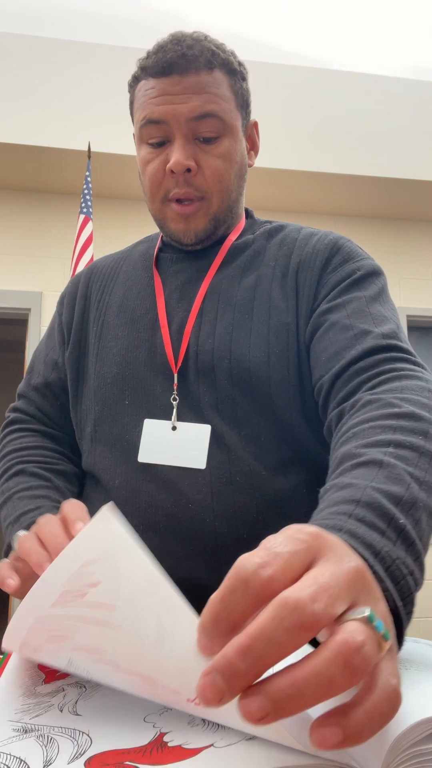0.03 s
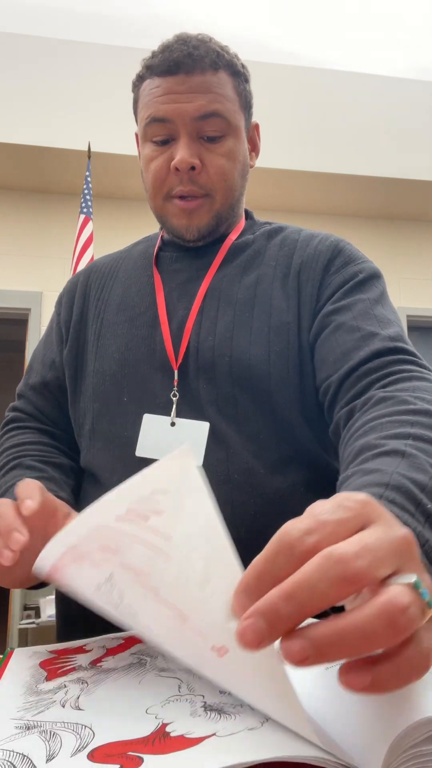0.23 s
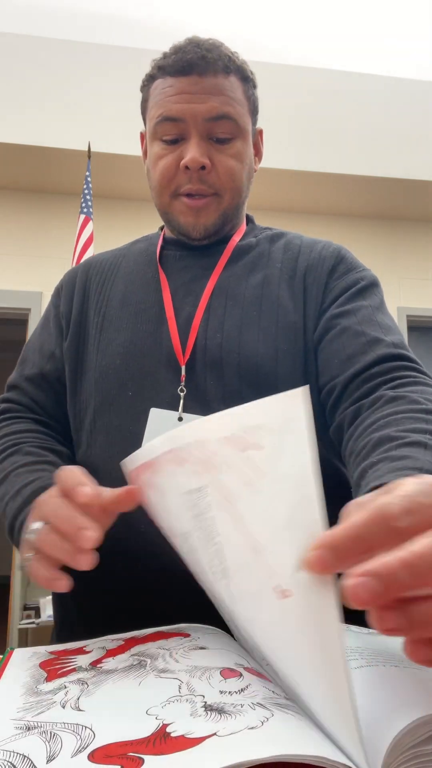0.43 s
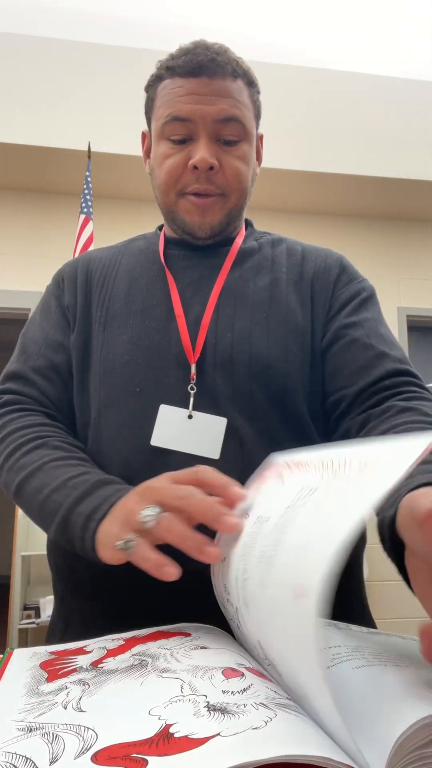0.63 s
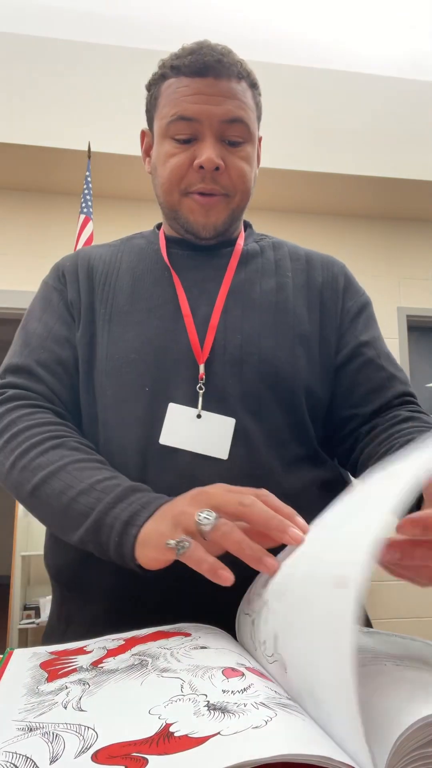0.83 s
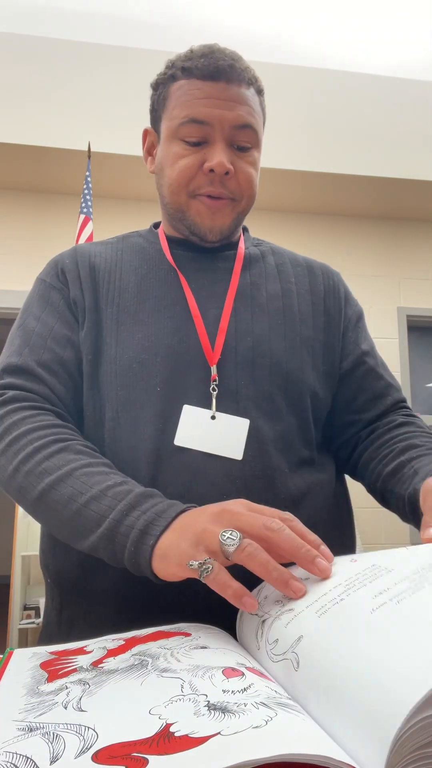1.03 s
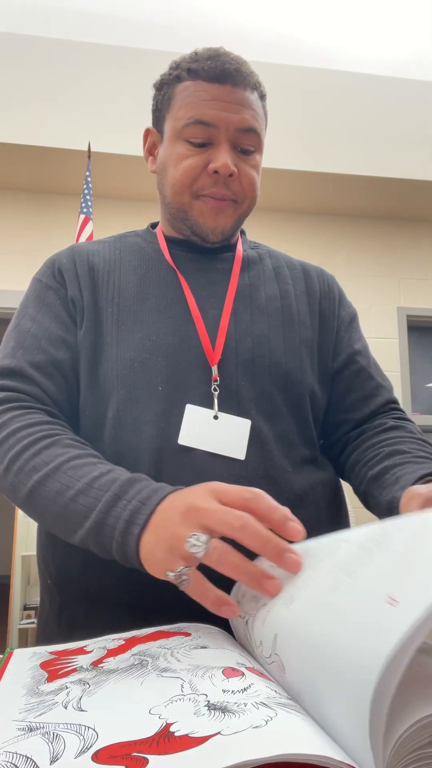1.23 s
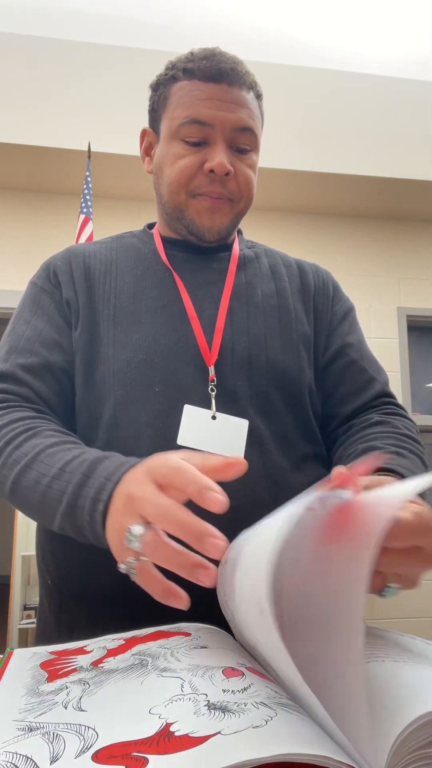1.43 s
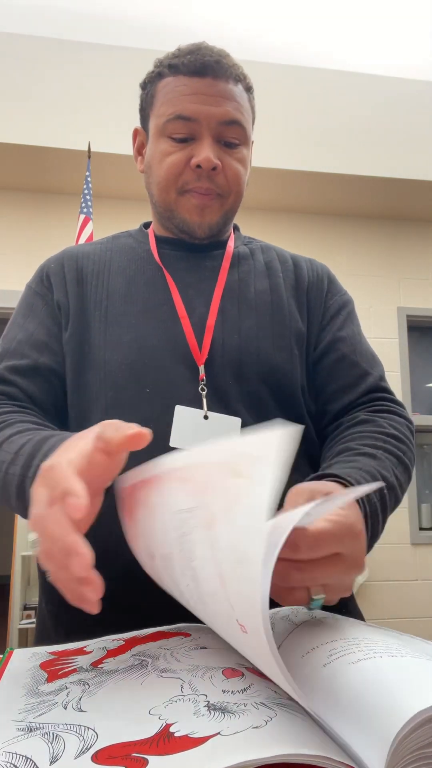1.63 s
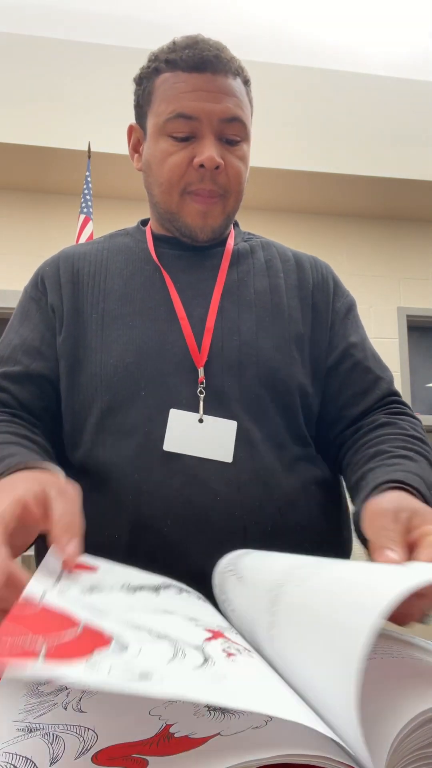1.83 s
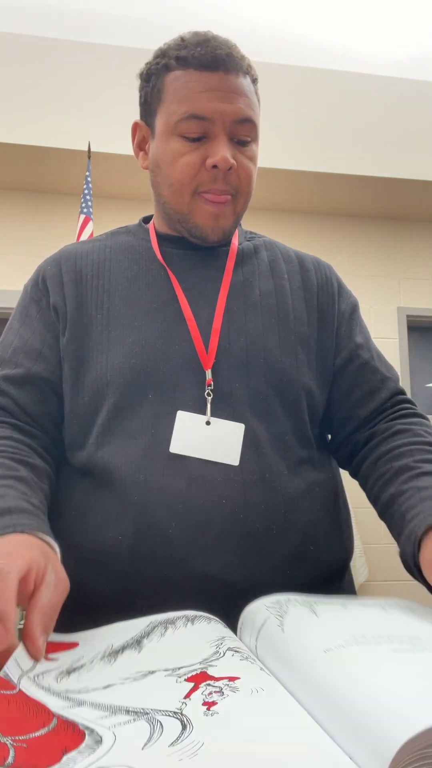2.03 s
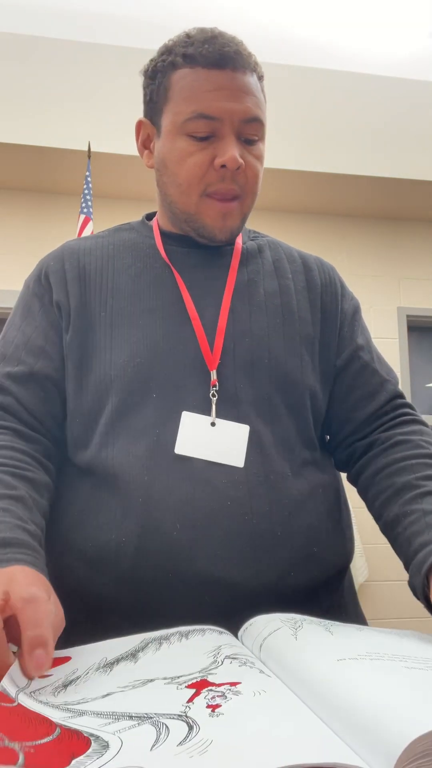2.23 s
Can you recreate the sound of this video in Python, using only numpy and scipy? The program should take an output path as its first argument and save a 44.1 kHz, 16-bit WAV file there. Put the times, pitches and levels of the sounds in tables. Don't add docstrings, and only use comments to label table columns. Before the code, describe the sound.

A large stiff book page is turned close to the microphone, buckling in sharp snaps with low thuds, then after a lull sliding over in a bright hiss and settling with soft pats, over faint room rumble.

```python
import sys
import numpy as np
from scipy import signal
from scipy.fft import rfft, irfft, next_fast_len
from scipy.io import wavfile
from scipy.ndimage import uniform_filter1d, map_coordinates

SR = 44100
rng = np.random.default_rng(int(sys.argv[2]) if len(sys.argv) > 2 else 0)


def log_audio(samples):
    frames = np.atleast_2d(samples).T
    limited = np.clip(frames, -1, 1)
    pcm = np.round(limited * 32767).astype(np.int16)
    wavfile.write(sys.argv[1], SR, pcm)


def how_loud(loudness_db):
    steps = np.asarray(loudness_db, float) / 20
    return 10 ** steps


N = 101429


def unit(x):
    return x / np.sqrt(np.mean(x ** 2) + 1e-20)


def noise(shape):
    return rng.standard_normal(shape)


def along(points, hz):
    f, v = np.transpose(points)
    return np.interp(np.log(hz + 1), np.log(f + 1), v)


def over_time(points):
    return np.interp(np.arange(N) / SR, *np.transpose(points))


def closed(points):
    return [(points[0][0] / 2, points[0][1] - 24), *points, (points[-1][0] * 1.2, points[-1][1] - 30)]


def filtered(x, response):
    m = next_fast_len(x.shape[-1] + 8192)
    return irfft(rfft(x, m) * response(np.fft.rfftfreq(m, 1 / SR)), m)[..., :x.shape[-1]]


def wobble(rate):
    return map_coordinates(noise(int(N * rate / SR) + 4), [np.arange(N) * rate / SR])


def patches(shape, bins, frames):
    return unit(uniform_filter1d(uniform_filter1d(noise(shape), bins, 0), frames, 1))


def rush(x, spectrum, patchy_db):
    z = signal.stft(x, nperseg=512)[2]
    x = signal.istft(z * how_loud(patchy_db * patches(z.shape, 6, 8)), nperseg=512)[1][:N]
    return unit(filtered(x, lambda hz: how_loud(along(closed(spectrum), hz))))


def add(track, s, piece):
    part = track[max(round(s * SR), 0):][:len(piece)]
    part += piece[:len(part)]


# frequency [Hz], level [dB].
VENT_COLOUR = [(32, -5.5), (60, 1.5), (220, -1), (400, -11), (900, -15), (2400, -23.5), (5200, -47.5),
               (14000, -50.5)]


def ventilation():
    level_db = -49 + .7 * wobble(7)
    return how_loud(level_db) * rush(noise(N), VENT_COLOUR, patchy_db=1.3)


# frequency [Hz], time to fall 60 dB [s].
HALL_T60 = [(100, 1), (2000, 0.37), (4500, 0.066), (6500, 0.014)]


def hall(page):
    hz, t, z = signal.stft(noise(SR // 3), SR, nperseg=256)
    tail = signal.istft(z * how_loud(-60 * t / along(HALL_T60, hz)[:, None]), SR, nperseg=256)[1]
    tail = tail / np.linalg.norm(tail)
    return how_loud(-24) * signal.fftconvolve(np.pad(page, (500, 0)), tail)[:N]


# time [s], level [dB], brightness [dB], centre of the hiss [kHz].
SLIDE_STROKE = [(0, -50.5, -13, 7.2), (.14, -74.5, -35, 13), (.42, -50, -29, 10), (0.431, -47.5, -7.5, 6.9),
                (.52, -51.5, -12, 4.7), (.6, -62, -33, 12), (0.778, -68, -23, 8.3), (.975, -61.5, -7, 10.4),
                (1.03, -63, -17, 10), (1.092, -58, -15, 6.9), (1.11, -51.5, -6, 9.4),
                (1.26, -39.5, -6, 6.9), (1.35, -45.5, -6.5, 7.6), (1.5, -46.5, -16.5, 8.9),
                (1.64, -50.5, -15, 7.2), (1.8, -62.5, -13, 7.1), (1.98, -61.5, -8.5, 8.1),
                (2.1, -61.5, -4.5, 8.2), (2.3, -64.5, -16, 11)]
# frequency [Hz], level [dB].
SLIDE_BODY = [(400, -16), (800, -6.5), (1300, -3.5), (1700, -5), (2300, 0), (3300, -8.5), (4600, -13)]
# frequency [Hz], level [dB].
SLIDE_HISS = [(5200, 4.5), (5800, -2), (6600, -5), (8000, -6.5), (12700, -1), (15500, -7)]
# time [s], pitch [kHz].
SHEET_NOTCH = [(0, 8.5), (.6, 5.7), (1.1, 6.2), (1.22, 5.2), (1.36, 7.9), (1.6, 7.3), (1.8, 7.2),
               (1.95, 6.1), (2.3, 5.9)]
# time [s], gain below 1700 Hz [dB].
FULLNESS = [(0, 8.5), (.45, 1), (.8, -6), (1.12, -7), (1.25, -1), (1.4, 5), (1.52, -4.5), (1.65, -3),
            (2.3, -1)]


def slide():
    s, level_db, bright_db, centre_khz = np.transpose(SLIDE_STROKE)
    catches = rng.random((2, N)) < 6000 / SR
    grains = catches * how_loud(3.5 * rng.exponential(size=(2, N))) * noise((2, N))
    grit = 0.25 * unit(grains) + noise((2, N))

    hz, t, z = signal.stft(grit[1], SR, nperseg=512)
    khz = hz[:, None] / 1000
    hump = np.exp(-((khz - np.interp(t, s, centre_khz)) / 2.5) ** 2)
    notch = np.exp(-((khz - np.interp(t, *np.transpose(SHEET_NOTCH))) / .6) ** 2)
    bent = signal.istft(z * how_loud(8 * hump - 5 * notch), nperseg=512)[1][:N]
    hiss = rush(bent, SLIDE_HISS, patchy_db=1.8)

    body = rush(grit[0], SLIDE_BODY, patchy_db=3.0)
    body = body + (how_loud(over_time(FULLNESS)) - 1) * filtered(body, lambda f: f < 1700)

    seconds = np.arange(N) / SR
    stroke_db = np.interp(seconds, s, level_db) + .9 * wobble(25)
    hiss_db = stroke_db + np.interp(seconds, s, bright_db) + 1.7 * wobble(40.87)
    return how_loud(stroke_db + wobble(70.0)) * body + how_loud(hiss_db) * hiss


# start [s], level [dB], length [s], centre [Hz], air [dB].
SCUFF_EVENTS = [(0.002, -50.5, 0.14, 400, -38), (0.079, -42, 0.011, 1700, -16.5),
                (0.238, -50, 0.021, 2750, -44), (0.285, -56, 0.012, 1390, -24),
                (0.308, -55.5, 0.03, 3200, -5), (0.32, -63, 0.027, 4000, 7.5), (0.336, -56, 0.012, 4000, 6),
                (0.534, -54, 0.014, 2130, -29), (0.538, -47, 0.02, 2180, -24),
                (0.55, -53.5, 0.0095, 2390, -4.5), (0.62, -57, 0.004, 4100, -19),
                (0.6546, -40, 0.0037, 2130, -18), (0.657, -47, 0.013, 2130, -20),
                (0.669, -52, 0.0074, 2900, -18), (0.681, -51.5, 0.0063, 2500, -22),
                (0.835, -55, 0.0034, 2570, -27), (0.8433, -53, 0.0025, 2260, -7.5),
                (0.848, -52, 0.0032, 1500, -19), (0.891, -46.5, 0.01, 2040, -23),
                (0.898, -58.5, 0.019, 1800, -25), (1.013, -48, 0.0072, 1390, -18),
                (1.451, -45, 0.031, 2870, -30), (1.4677, -48.5, 0.0033, 4200, -1),
                (1.48, -43, 0.0037, 1700, -33), (1.576, -50.5, 0.05, 1970, -38),
                (1.672, -43, 0.028, 1500, -9.5), (1.744, -41.5, 0.047, 750, -45),
                (1.752, -51.5, 0.035, 1550, -45), (1.862, -48.5, 0.043, 2040, -59),
                (1.87, -47.5, 0.053, 800, -45), (2.048, -67, 0.0028, 2980, -2),
                (1.938, -50, 0.038, 590, -43), (2.095, -59, 0.019, 2300, -24), (2.26, -56, 0.2, 3000, -5),
                (2.268, -69, .004, 3500, 4.5), (2.285, -38, 0.0022, 2780, -32)]
# frequency [Hz], level [dB].
SCUFF_AIR = [(2900, -26), (3200, -12), (5000, 7), (6500, -8.5), (8500, 1), (13000, 0.5), (15500, -6.5)]


def scuffs():
    out, t = np.zeros(N), np.arange(SR // 10) / SR
    octaves, rise_share, tick_s, tick_rest = 0.77, 0.07, 0.0038, 0.32
    tick = np.exp(-t / tick_s) + tick_rest
    for s, db, length, centre_hz, air_db in SCUFF_EVENTS:
        grit = noise(len(t)) * how_loud(1.3 * unit(uniform_filter1d(noise(len(t)), 60)))
        body = unit(filtered(grit, lambda hz: np.exp(-(np.log2((hz + 1) / centre_hz) / octaves) ** 2)))
        air = unit(filtered(grit, lambda hz: how_loud(along([(1500, -90), *SCUFF_AIR], hz))))
        air = how_loud(air_db + 4.0) * air * tick
        shape = np.clip(t / (rise_share * length), 0, 1) * np.exp(-(t / length) ** 3)
        add(out, s, how_loud(db) * shape * (body + air))
    return out


# peak time [s], peak level [dB], pitch [Hz], length [s].
SHORT_RINGS = [(0.013, -38.5, 2317, 0.011), (0.2497, -15.5, 2264, 0.0025), (.3455, -25, 4000, 0.00071),
               (0.3485, -18, 2234, 0.0013), (0.411, -41, 4200, 0.0013), (0.619, -29, 1450, 0.0012),
               (0.622, -33, 2450, 0.0017), (0.896, -42, 584, 0.0031), (1.467, -39, 2270, 0.0039),
               (1.469, -34, 4220, 0.0019), (1.673, -37.5, 1164, 0.0058), (1.874, -37, 520, 0.004),
               (1.876, -36, 1396, 0.0047)]


def rings():
    out, t = np.zeros(N), np.arange(SR // 20) / SR - .01
    for s, db, hz, length in SHORT_RINGS:
        drift = unit(uniform_filter1d(uniform_filter1d(noise(len(t)), size=70), size=40))
        phase = 2 * np.pi * hz * t + 0.68 * drift
        swell = np.exp(-np.abs(t) / length / np.where(t > 0, 1, .6))
        add(out, s - .01, how_loud(db) * uniform_filter1d(swell, size=15) * np.cos(phase))
    return out


# time [s], peak [dB], thud over the crack [dB],
# bending-wave lag near 100 Hz [ms], brightness [dB].
BUCKLES = [
    (0.1687, -26, -12, 12, -4),
    (0.2008, -16.5, 1, 14, -3.5),
    (0.2495, -8, -6, 9, -4.5),
    (0.345, -8.5, -4.5, 12.8, -2.5),
    (0.3796, -15, -5, 13.3, -8),
    (.409, -26.5, 8.5, 13.6, -5.5),
    (0.4321, -30, 6, 13, -6),
    (.617, -22.5, -26, 6.5, 2.5),
]
# crumple [dB], treble click [dB], sizzle [dB].
BUCKLE_TEARS = [(-0.5, -14, 4), (1.5, -10, 6), (-4, -5.5, -2), (-1.5, -1, -1), (-9, -0.5, 2.5),
                (-2.5, 1, 7), (4, 2, -8), (-1, -38, -11)]
# frequency [Hz], level [dB].
CRACK_COLOUR = [(400, -11.5), (900, -2), (1600, -4.5), (3000, -19), (4500, -15), (6000, -28.5), (9000, -21),
                (14000, -24.5)]
# frequency [Hz], level [dB].
THUD_COLOUR = [(40, -11), (70, 3), (250, -2), (800, -10.5), (1600, -76)]


def snaps():
    out, t = np.zeros(N), np.arange(SR // 8) / SR - .004
    edge_s, edge_db = 0.0039, -14.5
    crumple_t60 = np.where(t > 0, 0.028, .006)
    sizzle_s = 0.0074
    blow = -np.exp(-(t * SR) ** 2) - how_loud(edge_db) * np.exp(-((t - edge_s) * SR) ** 2)
    for (s, db, thud_db, lag_ms, bright_db), (crumple_db, click_db, sizzle_db) in zip(BUCKLES, BUCKLE_TEARS):
        tilt = [(1200, 0), (2000, bright_db), (3000, bright_db), (5500, bright_db + click_db)]

        def late(hz):
            bending = lag_ms / 10 * np.log(1 + hz / 25) * (hz > 0)
            return np.exp(-2j * np.pi * (bending - hz * 0.00012))

        crumple = how_loud(-14 + crumple_db - 60 * np.abs(t) / crumple_t60) * noise(len(t))
        struck = blow + filtered(crumple, lambda hz: hz < 5200)
        crack = filtered(struck, lambda hz: how_loud(along(closed(CRACK_COLOUR), hz) + along(tilt, hz)) * late(hz))
        thud = filtered(blow, lambda hz: how_loud(along(closed(THUD_COLOUR), hz)) * late(hz))
        sizzle_gate = (t > 0) * np.exp(-(t / sizzle_s) ** 6)
        sizzle = how_loud(-28.5 + sizzle_db) * sizzle_gate * filtered(noise(len(t)), lambda hz: hz > 5200)
        snap = (crack + how_loud(3.5 + thud_db) * thud) / np.abs(crack).max()
        add(out, s - .004, how_loud(db) * snap + how_loud(db + bright_db / 2) * sizzle)
    return out


def scatter(x):
    z = signal.stft(x, nperseg=512)[2]
    return signal.istft(z * np.exp(1.8j * patches(z.shape, 5, 5)), nperseg=512)[1][:N]


# frequency [Hz], side over mid [dB].
SIDE_LEVEL = [(60, -33), (290, -15), (1100, -6), (2250, -8), (3600, -4), (6500, 4), (9000, 1.5),
              (13000, -27)]
# frequency [Hz], unrelated share of the side [0-1].
SIDE_DIFFUSE = [(100, 0.22), (2000, 0.48), (7000, 0.25), (14000, 0.67)]
# frequency [Hz], left share [ratio].
LEFT_LEAN = [(60, 0.014), (500, 0.037), (2500, -0.034), (5000, -0.098)]


def two_ports(mid, buckles):
    cancel_hz, cancel_width_hz = 5050, 92
    wide = mid - 0.31 * buckles
    scattered = scatter(wide)

    def loose(hz):
        return np.clip(along(SIDE_DIFFUSE, hz), 0, 1)

    def turned(hz):
        quarter = -1j * np.sign(cancel_hz - hz)
        return quarter * np.sqrt(1 - loose(hz) ** 2) * how_loud(along(SIDE_LEVEL, hz)) + along(LEFT_LEAN, hz)

    side = 0.031 * buckles + filtered(wide, turned)
    side = side + filtered(scattered, lambda hz: loose(hz) * how_loud(along(SIDE_LEVEL, hz)))
    mid = filtered(mid, lambda hz: 1 - 1 / (1 + ((hz - cancel_hz) / cancel_width_hz) ** 2))
    return np.array([mid + side, mid - side])


def scene():
    buckles = snaps()
    page = buckles + rings() + scuffs() + slide()
    return two_ports(page + hall(page) + ventilation(), buckles)


# frequency [Hz], width [Hz], gain [dB].
PORT_CAVITIES = [(2155, 203, 6.5), (4270, 380, 4)]
# frequency [Hz], gain [dB].
TOP_DROOP = [(14300, -0.5), (15200, -2.5), (16400, -37)]


def microphone(x):
    def response(f):
        gain = (f < 16500) * how_loud(along(TOP_DROOP, f))
        for c, w, db in PORT_CAVITIES:
            gain = gain * (1 + (how_loud(db) - 1) * 1j * f * w / (c * c - f * f + 1j * f * w))
        return gain
    return filtered(x, response)


def top_cut(x):
    return signal.sosfilt(signal.butter(12, 16520, fs=SR, output="sos"), x)


def record(dry):
    mix = microphone(dry)
    return top_cut(mix)


dry = scene()
out = record(dry)
log_audio(out)
```